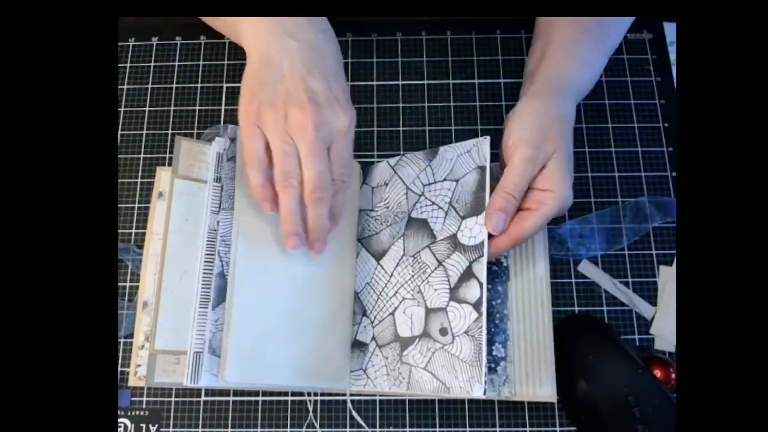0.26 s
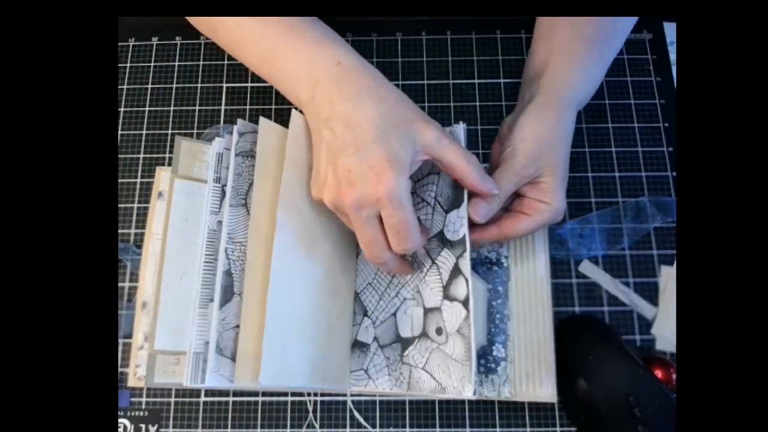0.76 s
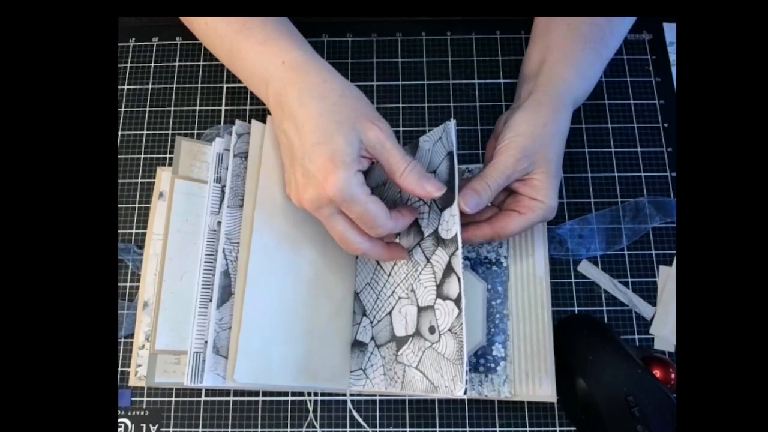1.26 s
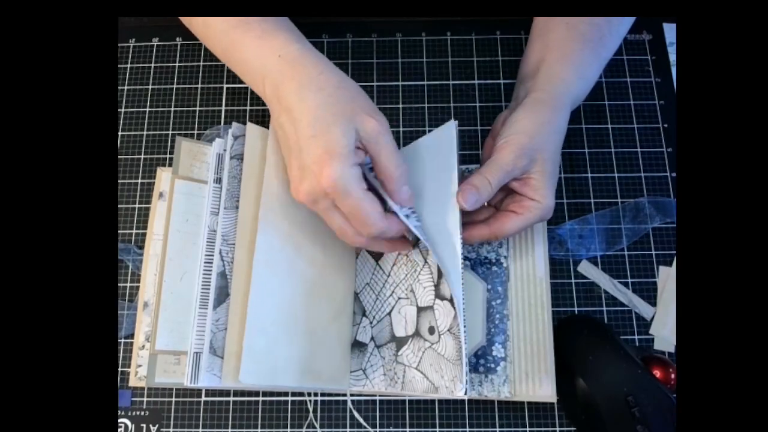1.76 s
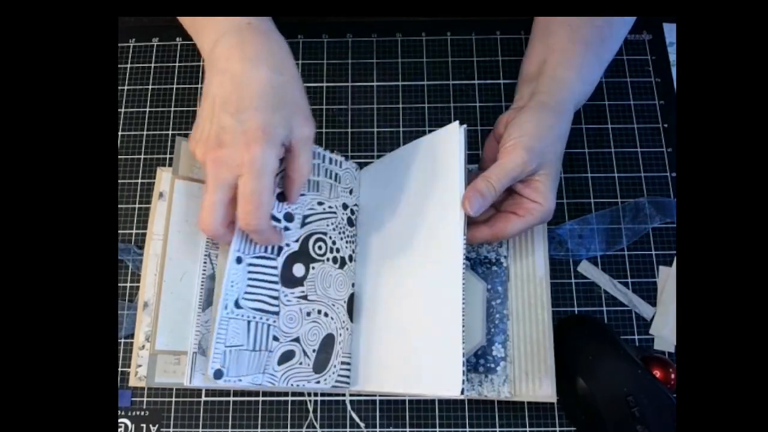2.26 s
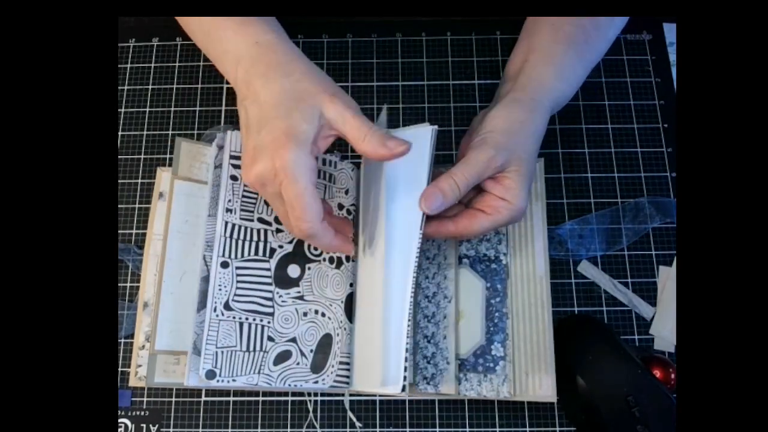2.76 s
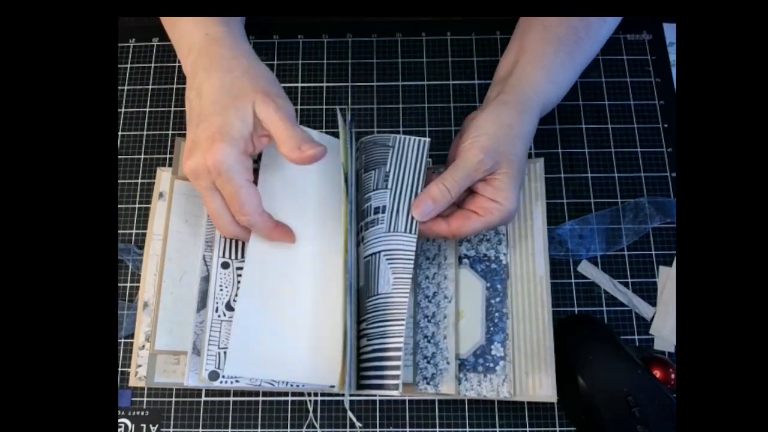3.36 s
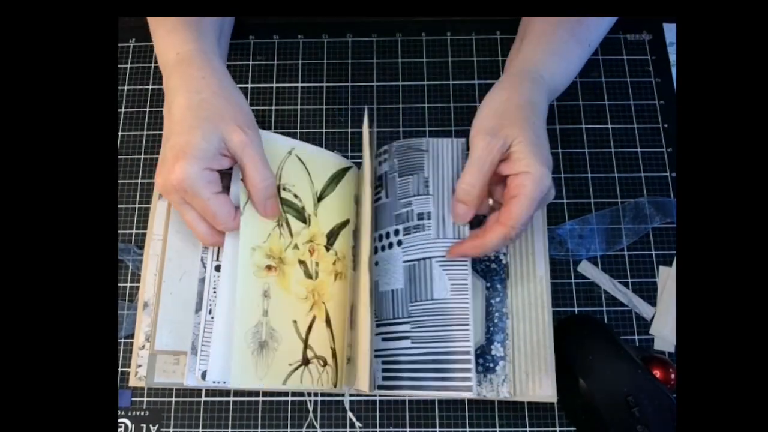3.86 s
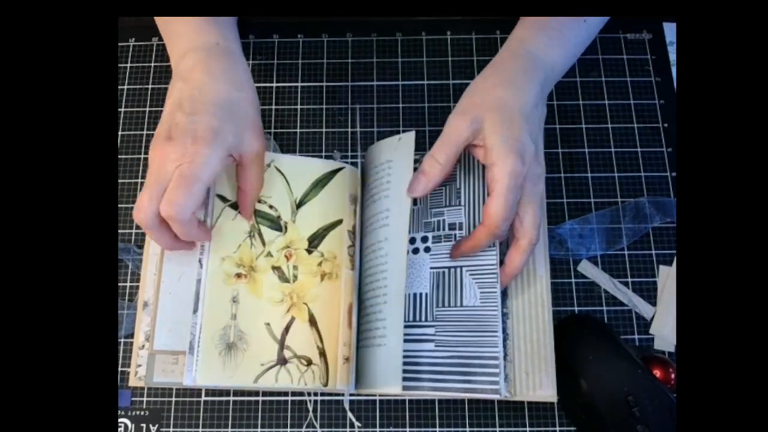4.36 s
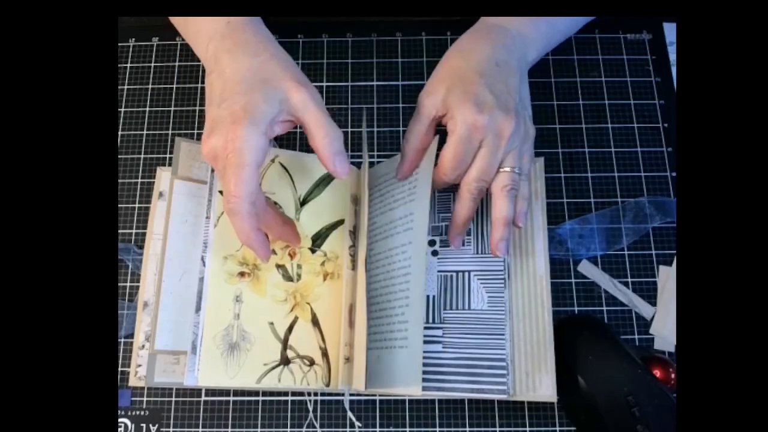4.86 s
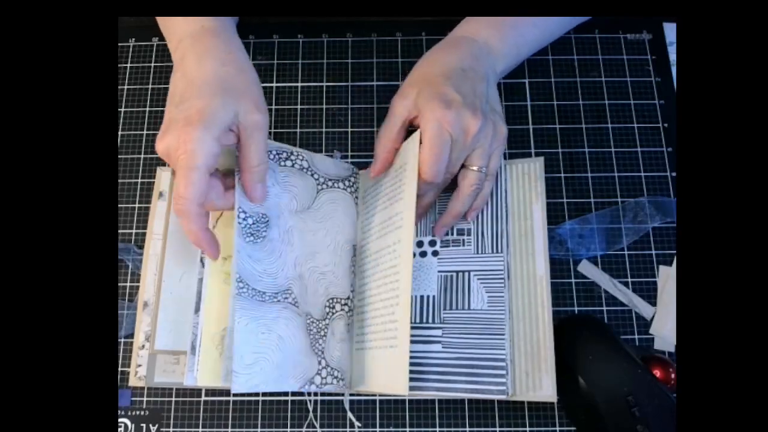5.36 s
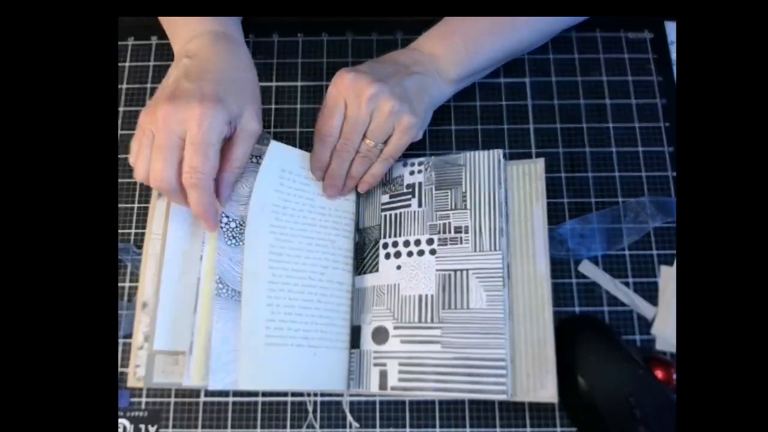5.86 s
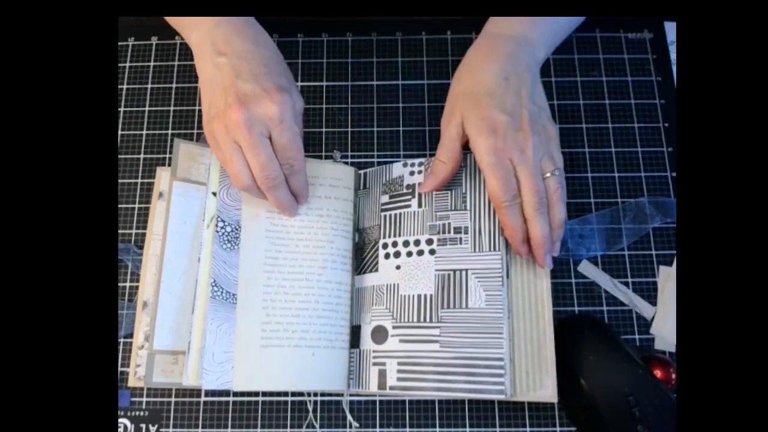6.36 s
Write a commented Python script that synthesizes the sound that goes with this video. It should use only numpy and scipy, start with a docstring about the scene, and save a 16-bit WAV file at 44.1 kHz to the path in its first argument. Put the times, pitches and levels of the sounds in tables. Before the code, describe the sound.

In a small quiet room, paper pages are turned by hand close to the microphone, sounding bright and a little hollow. An opening flap and sharp snap lead to small clicks from the journal's binding, then uneven bursts of sliding, crackling and flapping sheets. A faint, thin high ring comes and goes in the second half. After one longer swish a page flaps down, and the binding ticks again.

```python
"""Two hands leaf through a thick handmade paper journal on a desk, in a quiet room.
A page flaps down at once, and near 1 s the binding ticks under the fingers. Sheets slide with friction,
buckle with short snaps and flap again near 2, 3.7 and 4.7 s; a thin 4.7 kHz ring swells from 3 s.
A long slide ends in a flap at 6 s, and the binding ticks last. Throughout, the close microphone's
signal is doubled 2 ms later; it overloads on the loudest flaps."""
import sys
import numpy as np
from scipy import signal
from scipy.fft import rfft, irfft, next_fast_len
from scipy.io import wavfile
from scipy.ndimage import uniform_filter1d

SR = 44100
rng = np.random.default_rng(int(sys.argv[2]) if len(sys.argv) > 2 else 0)


def log_audio(samples):
    """Write samples as a 16-bit WAV file to the path given in sys.argv[1]."""
    # one column per channel
    frames = np.atleast_2d(samples).T
    # limit to full scale, then quantise
    limited = np.clip(frames, -1, 1)
    pcm = np.round(limited * 32767).astype(np.int16)
    wavfile.write(sys.argv[1], SR, pcm)


N = 291501
SIZE = next_fast_len(N)
HZ = np.fft.rfftfreq(SIZE, 1 / SR)
TIME = np.arange(N) / SR


# a sheet or hand slides over paper: start t/s, length/s, level/dB, swell/dB, body/dB, edge/dB, surface f/Hz
SLIDES = [(0.0, .075, -21.5, -7.5, -15.5, 0.5, 5200), (.11, 0.095, -33, -12.5, -3, -2, 4300),
          (0.206, .12, -32, 10.5, -13, -8, 4400), (.41, .14, -41, -2, -10, 3, 5250),
          (.745, .05, -35.5, -8, -19, -11, 5100), (.94, .13, -46, 6.5, -15, -5.5, 4300),
          (1.085, .08, -32.5, -19, -15, -3.5, 4300), (1.411, 0.093, -51, -16.5, -22, -22.5, 4536),
          (1.685, .24, -28.5, 16, -16, -4, 5000), (1.92, 0.26, -29.5, -12.5, 1, 2.5, 4450),
          (2.196, 0.2, -28, 6, -12.5, -5.5, 5200), (2.445, .03, -42, 3, -1.5, -20, 5200),
          (2.51, .06, -51, -6.5, -4, -7, 5200), (3.005, .06, -37, -14.5, 3, -11, 4600),
          (3.07, .23, -42.5, -8, -10.5, -7, 4650), (3.324, .11, -39.5, 12, -10, -17, 4650),
          (3.69, .085, -25, -5.5, -7.5, -10.5, 4350), (3.79, .28, -32.5, -4.5, -15.5, -14.5, 5000),
          (4.07, .2, -37, 0, -7.5, -4, 4650), (4.27, .14, -28, 3.5, -12, -3, 4600),
          (4.505, .025, -40.5, -14, 2, -7, 4600), (4.57, .15, -29.5, 2, -7, -10.5, 4600),
          (4.73, .1, -29.5, -4, -21, -5, 5100), (4.83, 0.22, -45, -22, -27.5, 2.5, 5750),
          (5.028, 0.28, -53, 14, -14.5, -4, 5200), (5.26, .14, -44.5, 12.5, -4.5, 1, 4650),
          (5.4, .15, -24.5, 6.5, -20.5, -8, 4750), (5.567, .25, -24.5, 11, -21.5, -17, 4600),
          (5.81, .14, -25, 3, -15.5, 1.5, 4600), (5.965, .06, -32, -14, -2, -25, 4500),
          (6.14, .045, -32, -9.5, -8.5, -13, 4600)]
def sliding(level_db=-2.5, flutter_db=-12, catch_db=0.18, catch_hz=70, patchy_db=1.5):
    """Stick-slip friction: sheets catch and let go; overlapping slides are incoherent and add in power."""
    power = sum(np.outer(register_gains(db, flutter_db, body_db, edge_db),
                         stroke(start, length, swell_db)) ** 2
                for start, length, db, swell_db, body_db, edge_db, _ in SLIDES)
    patches = np.array([wander(45) for _ in power])
    grain = fibres(spread_db=-2.0, facet_db=4.0)
    rustle = (grain * np.sqrt(power) * gain_of(patchy_db * patches)).sum(0)
    return rustle * gain_of(level_db + catch_db * wander(catch_hz))


def stroke(start, length, swell_db, attack_s=0.018, release_s=0.019):
    """Friction envelope: a linear attack, a hold that swells or fades, an exponential release."""
    t = np.maximum(TIME - start, 0)
    hold = gain_of(swell_db * (np.minimum(t / length, 1) - 0.5))
    release = np.exp(-np.clip((t - length) / release_s, 0, 20))
    return np.minimum(t / attack_s, 1) * hold * release


# a sheet buckles: peak t/s, level/dB, body/dB, edge/dB, rise/s, decay/s
BUCKLES = [(.033, -12, -25, 5.5, 0.00073, 0.0025), (0.043, -14.5, -37, -0.5, .004, 0.006),
           (0.0854, -4, -8, -3, 0.001, 0.0044), (0.108, -23, 6, 4, 0.015, 0.001),
           (0.2942, -17.5, -29, -22, 0.0033, 0.0055), (0.7469, -8, -33.5, -7.5, 0.0049, 0.00084),
           (1.0575, -21, -17, -24, 0.0039, .00082), (1.088, 0, -14.5, -2, .00061, 0.0029),
           (1.6858, -22, -16, -2, 0.0012, 0.0016), (1.691, -19, -11.5, -13, .001, 0.024),
           (1.7387, -11, -12, -15.5, 0.0033, 0.015), (1.7695, -16, -15.5, 1, 0.0046, 0.014),
           (1.897, -13, -12, -6, 0.003, .0011), (1.9887, -4, -4.5, -3, 0.0013, 0.0063),
           (2.0167, -9.5, -12.5, -8.5, .0015, 0.031), (2.392, -19.5, -11, -1.5, 0.028, 0.01),
           (2.8894, -5, -33, -10, .001, 0.0014), (2.934, -18.5, -13.5, -9, 0.0075, 0.015),
           (3.0002, -21.5, -9.5, -14, 0.0037, 0.0016), (3.0979, -13.5, -19.5, -2.5, 0.0084, 0.0068),
           (3.6671, -16, -15, -36, 0.00094, 0.0072), (3.7611, -23, -19, 1.5, .00089, 0.025),
           (3.876, -27.5, -24, -7, .004, 0.054), (4.334, -20.5, -9, 4, 0.0033, .0013),
           (4.3462, -10, -9, -6.5, 0.0023, 0.0029), (4.3763, -10, -22, -26, .0017, 0.0053),
           (4.57, -14, -18.5, -33, 0.001, 0.014), (4.9908, -30, -19, -20, .0011, .008),
           (5.2853, -26.5, -9, -7.5, 0.016, .0017)]
def buckling(grain, level_db=-2.93, flutter_db=-11):
    """Elastic instability: a bent sheet builds up stress and lets go in a snap."""
    out = np.zeros(N)
    for s, db, body_db, edge_db, rise, decay in BUCKLES:
        gains = register_gains(db + level_db, flutter_db, body_db, edge_db)
        add(out, *avalanche(grain, s, gains, rise, decay))
    return out


# a whole page flaps: peak t/s, level/dB, flutter/dB, body/dB, edge/dB, decay/s, body f/Hz
PAGE_FLAPS = [(0.0902, -18, -6.5, 8, -13, 0.022, 2330), (1.9361, -22.5, -22.5, 6.5, -9.5, .007, 2860),
              (2.025, -29.5, -9, 5.5, -12, 0.008, 2350), (2.1138, -19, -8, 0, -6, 0.011, 2300),
              (3.6938, -11, -1.5, -12.5, -33, 0.002, 1394), (4.7117, -23, -1.5, -9.5, -23, .0086, 1950),
              (5.9605, -10.5, -8, 0, 0.5, 0.0038, 2700)]
def flapping(grain, level_db=1.14, rise_s=0.0008):
    """Impulsive excitation: a flap sets the whole sheet moving at once."""
    out = np.zeros(N)
    for s, db, flutter_db, body_db, edge_db, decay, _ in PAGE_FLAPS:
        gains = register_gains(db + level_db, flutter_db, body_db, edge_db)
        add(out, *avalanche(grain, s, gains, rise_s, decay))
    return out


def avalanche(grain, s, gains, rise, decay):
    """An avalanche of slips grows exponentially up to s and dies away; gives its start and its sound."""
    near = slice(max(int((s - 0.05) * SR), 0), int((s + 0.15) * SR))
    t = TIME[near] - s
    swell = np.exp(-abs(t) / np.where(t < 0, rise, decay))
    burst = grain[:, near] * swell
    burst *= np.linalg.norm(swell) / np.linalg.norm(burst, axis=1, keepdims=True)
    return TIME[near.start], gains @ burst


# spectrum of the paper: f/Hz, level/dB
PAPER_SPECTRUM = [(100, -45.5), (300, -24.5), (600, -21), (900, -12.5), (1150, -10), (1400, -7),
                  (1900, -7.5), (2350, -7), (3100, -6.5), (4200, 13.5), (5200, 10), (6200, -0.5),
                  (7200, -1), (8000, -11.5)]
MIC_TOP_HZ = 8040
def fibres(spread_db, facet_db, per_s=12000, flutter_hz=1700, body_hz=3300, edge_hz=5650):
    """Shot noise of tiny fibre slips, in a sheet's four registers: flutter, body, surface and edge."""
    strength = gain_of(spread_db * np.minimum(rng.exponential(1, N), 4))
    slips = rng.standard_normal(N) * strength * (rng.random(N) < per_s / SR)
    slips = creases(flexing(slips), facet_db)
    lowest, low, high = below(flutter_hz, order=8), below(body_hz, order=12), below(edge_hz, order=16)
    registers = lowest, np.sqrt(1 - lowest ** 2) * low, np.sqrt(1 - low ** 2) * high, np.sqrt(1 - high ** 2)
    sheet = shape(PAPER_SPECTRUM) * below(MIC_TOP_HZ, order=90)
    return np.array([unit_rms(colour(slips, sheet * band)) for band in registers])


def register_gains(db, flutter_db, body_db, edge_db):
    """Spectral balance: body and edge count from the surface, the flutter from the body."""
    return gain_of(db + np.array([body_db + flutter_db, body_db, 0, edge_db]))


def flexing(slips, body_db=9, surface_db=1, drift=0.012):
    """Time-varying resonance: two modes of the sheet shift as it bends."""
    body_hz, surface_hz = (hz * (1 + drift * wander(25)) for hz in sheet_pitches())
    body = gain_of(body_db) * resonate(slips, body_hz, width_hz=450)
    surface = gain_of(surface_db) * resonate(slips, surface_hz, width_hz=550)
    return slips + body + surface


def sheet_pitches(rest_hz=2295, db_per_octave=65.5, hang_s=0.053):
    """Natural frequencies of body and surface: the more of the sheet moves, the lower its body rings."""
    start, length, _, _, body_db, _, surface_hz = np.transpose(SLIDES)
    middle = start + length / 2
    body_hz = np.interp(TIME, middle, rest_hz * 2 ** (-body_db / db_per_octave))
    for s, *_, flap_hz in PAGE_FLAPS:  # a flapping sheet briefly hangs free, at its own pitch
        body_hz += (flap_hz - body_hz) * np.exp(-((TIME - s) / hang_s) ** 2)
    return body_hz, np.interp(TIME, middle, surface_hz)


def creases(slips, depth_db, size=512):
    """Local resonance: small facets each favour a narrow band for a few hundredths of a second."""
    spectra = signal.stft(slips, nperseg=size)[2]
    facets = uniform_filter1d(rng.standard_normal(spectra.shape), size=4, axis=0)
    facets = unit_rms(uniform_filter1d(facets, size=7, axis=1))
    return signal.istft(spectra * gain_of(depth_db * np.clip(facets, -2, 2)), nperseg=size)[1][:N]


# spectrum of a full ping: f/Hz, level/dB
PING_SPECTRUM = [(200, -57.5), (700, -9.5), (1500, -29.5), (2300, -19.5), (2800, -13), (3300, -36.5),
                 (3800, 4), (4350, 17), (4750, 15), (5200, -41.5), (6200, -18.5), (7200, -45)]
# the binding ticks: t/s, level/dB, ring (0 a dry crack, 1 a full ping)
BINDING_TICKS = [(1.008, -5.5, 0.74), (1.0244, -1.5, 0.79), (1.072, 1, 0.72), (1.4039, -16.5, 0.36),
                 (1.4077, -17.5, 0.35), (6.0753, -7, 0.76), (6.092, -5, 0.77), (6.1393, -7.5, 0.77),
                 (6.146, -6, 0.54), (6.4031, -10.5, 0.85), (6.42, -8.5, .81)]
def ticking(book_db=-33, size=2048):
    """Impulse response: the binding slips and gives a bright ping, with a little of the book under it."""
    log_gain = np.log(shape(PING_SPECTRUM, abs(np.fft.fftfreq(size, 1 / SR))))
    log_response = signal.hilbert(log_gain).conj()  # minimum phase: sharp start, short ring
    out = np.zeros(N)
    for s, db, ring in BINDING_TICKS:
        ping = np.fft.ifft(np.exp(ring * log_response)).real
        add(out, s, gain_of(db) * ping / abs(ping).max())
        add(out, s, gain_of(db + book_db) * book_ring())
    return out


# brief soft tones near 4.4 kHz: peak t/s, level/dB, f/Hz, Gaussian width/s
TICK_TONES = [(1.057, -17, 4320, .002), (6.074, -22.5, 4500, 0.0014), (6.096, -31.5, 4340, 0.02),
              (6.407, -20, 4380, 0.00086)]
def tick_tones():
    """Gaussian tone pulses: brief soft sinusoids swell and fade around the ticks."""
    return sum(gain_of(db) * np.exp(-((TIME - s) / width) ** 2 / 2) * np.sin(2 * np.pi * hz * TIME)
               for s, db, hz, width in TICK_TONES)


# a page or finger lands on the book: t/s, level/dB, contact time/s
LANDINGS = [(0.09, -38.5, 0.000396), (1.089, -39, .0001), (2.669, -46, 0.00016), (2.937, -37.5, 0.00028),
            (3.712, -38.5, 0.00013), (4.379, -38, 0.00011), (4.572, -42, 0.00013), (4.712, -39.5, 0.000092),
            (5.96, -33, 0.000067)]
def knocking(settle=0.099, settle_s=0.0097, settle_per_s=2000):
    """Impact: one blow, then loose sheets settle; a longer contact favours the book's low modes."""
    out, t = np.zeros(N), TIME[:SR // 20]
    for s, db, contact in LANDINGS:
        blows = rng.standard_normal(len(t)) * (rng.random(len(t)) < settle_per_s / SR)
        blows *= settle * np.exp(-t / settle_s)
        blows[0] = 1
        push = t * np.exp(-t / contact)
        force = signal.fftconvolve(blows, push / push.sum())
        add(out, s, gain_of(db) * signal.fftconvolve(force, book_ring()))
    return out


# modes of the book on the desk: f/Hz, level/dB, T60/s
BOOK_MODES = [(158, -9, 0.14), (343, -7.5, 0.056), (480, -12.5, 0.0095), (546, -14, 0.13),
              (622.5, 4.5, 0.077), (850, 1.5, 0.042), (968, -4.5, 0.038)]
def book_ring(place_db=3, detune=0.018):
    """Modal superposition: the struck book rings dully, and the place struck weights its damped modes."""
    t = TIME[:SR // 4]
    chance = rng.standard_normal((len(BOOK_MODES), 2))
    return sum(gain_of(db + place_db * place - 60 * t / t60)
               * np.sin(2 * np.pi * hz * (1 + detune * bend) * t)
               for (hz, db, t60), (place, bend) in zip(BOOK_MODES, chance))


# a hand shifts on the book: start t/s, length/s, level/dB, swell/dB
PALM_RUBS = [(2.668, 0.15, -53.5, -3), (6.42, .19, -60.5, -7)]
def rubbing(low_hz=110, high_hz=330):
    """Transmission loss: a palm's friction noise comes dulled through the stack of pages."""
    band = below(high_hz, order=3) * (1 - below(low_hz, order=3))
    envelope = sum(gain_of(db) * stroke(s, length, swell_db) for s, length, db, swell_db in PALM_RUBS)
    return noise(band) * envelope


def room(x, wet_db=-21, t60=0.087, echoes_per_s=3000, gap_s=0.004):
    """Reverberation: weak scattered reflections die away in a small furnished room."""
    t = TIME[:SR // 3]
    echoes = rng.standard_normal(len(t)) * (rng.random(len(t)) < echoes_per_s / SR)
    echoes *= (t > gap_s) * gain_of(-60 * t / t60)
    return x + gain_of(wet_db) * signal.fftconvolve(x, echoes / np.linalg.norm(echoes))[:N]


# a thin ring swells and fades behind the paper: t/s, level/dB
RING_LEVELS = [(0, -56), (2.9, -60.5), (3.15, -40.5), (3.55, -51), (4.1, -43), (5.1, -51.5), (6.3, -56),
               (6.45, -48.5), (6.6, -60.5)]
def thin_ring(hz=4650, width_hz=210):
    """Narrow-band noise: hiss confined around one frequency is heard as a fuzzy whistle."""
    band = 1 / (1 + (2 * (HZ - hz) / width_hz) ** 2)
    return noise(band) * gain_of(np.interp(TIME, *np.transpose(RING_LEVELS)))


# spectra of the room's rumble and the microphone's hiss: f/Hz, level/dB
RUMBLE_SPECTRUM = [(10, -17), (35, -5.5), (55, -2.5), (85, -1), (160, -3), (240, -7.5), (350, -10),
                   (550, -19), (900, -23.5), (2000, -47)]
HISS_SPECTRUM = [(100, -3.5), (1000, 0), (2800, -3.5), (3700, -1), (4600, 8), (5400, -0.5), (6500, -1.5),
                 (8000, -6), (10500, -5.5), (11400, -17), (15000, -13.5), (16000, -28.5)]
def background(rumble_db=-56, hiss_db=-61):
    """Stationary noise floor: low room rumble and the hiss of the microphone."""
    rumble = gain_of(rumble_db) * noise(shape(RUMBLE_SPECTRUM))
    return rumble + gain_of(hiss_db) * noise(shape(HISS_SPECTRUM))


def gain_of(db):
    """Amplitude ratio of a level in decibels."""
    return 10 ** (np.asarray(db) / 20)


def unit_rms(x):
    """Normalisation to rms 1."""
    return x / np.sqrt(np.mean(x ** 2) + 1e-20)


def shape(points, hz=HZ):
    """Gain of a spectrum table, interpolated on a log-frequency axis."""
    f, db = np.transpose(points)
    return gain_of(np.interp(np.log(hz + 1), np.log(f + 1), db))


def below(hz, order):
    """Magnitude response of a low-pass."""
    return 1 / np.sqrt(1 + (HZ / hz) ** (2 * order))


def colour(x, gain):
    """Filtering as multiplication of the spectrum."""
    return irfft(rfft(x, SIZE) * gain, SIZE)[:N]


def noise(gain):
    """Spectrally shaped Gaussian noise of rms 1."""
    return unit_rms(colour(rng.standard_normal(N), gain))


def wander(rate_hz):
    """Random modulation of rms 1, up to about rate_hz."""
    return unit_rms(np.interp(2 * rate_hz * TIME, np.arange(N // 100), rng.standard_normal(N // 100)))


def resonate(x, hz, width_hz):
    """Heterodyning: shifting the curve hz to zero, smoothing and shifting back gives a moving resonance."""
    carrier = np.exp(2j * np.pi * np.cumsum(hz) / SR)
    pole = np.exp(-np.pi * width_hz / SR)
    return 2 * (carrier * signal.lfilter([1 - pole], [1, -pole], x / carrier + 1e-18)).real


def add(mix, s, sound):
    """Superposition of a sound onto the mix at time s."""
    part = mix[max(round(s * SR), 0):][:len(sound)]
    part += sound[:len(part)]


def scene(right_lead_s=0.000015):
    """Superposition at one microphone; a linear phase shift puts the right channel a hair earlier."""
    rustle = sliding()
    grain = fibres(spread_db=2.0, facet_db=4.5)
    paper = rustle + buckling(grain) + flapping(grain)
    journal = room(paper + ticking() + tick_tones() + knocking() + rubbing())
    sound = colour(journal, below(MIC_TOP_HZ, order=110)) + thin_ring() + background()
    return np.array([sound, colour(sound, np.exp(2j * np.pi * HZ * right_lead_s))])


def low_swell(x, knee=0.02, share=0.2, hz=7):
    """Rectification: the microphone answers loud sound lopsidedly, leaving a slow push in the deep bass."""
    return share * signal.lfilter(*signal.butter(1, hz, fs=SR), np.maximum(abs(x) - knee, 0))


def record(dry, input_db=0.56, delay_s=0.002124, top_hz=16500):
    """Comb filtering by a delayed copy hollows the sound; clipping and a band limit follow."""
    comb = (1 + np.exp(-2j * np.pi * HZ * delay_s)) / np.sqrt(2)  # a notch every 470 Hz
    doubled = gain_of(input_db) * np.array([colour(channel, comb) for channel in dry])
    clipped = np.clip(doubled + low_swell(doubled), -1, 1)
    return signal.oaconvolve(clipped, signal.firwin(255, top_hz, fs=SR)[None], "same")


dry = scene()
out = record(dry)
log_audio(out)
```